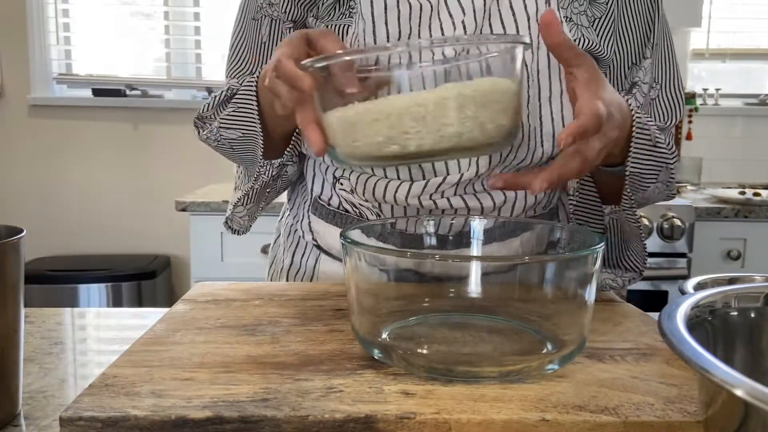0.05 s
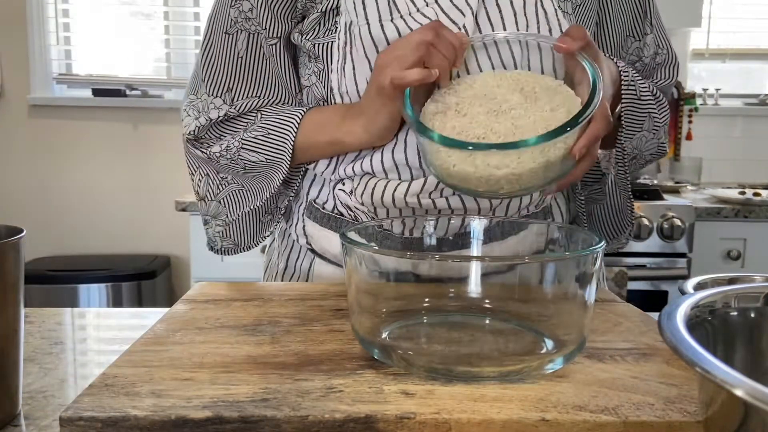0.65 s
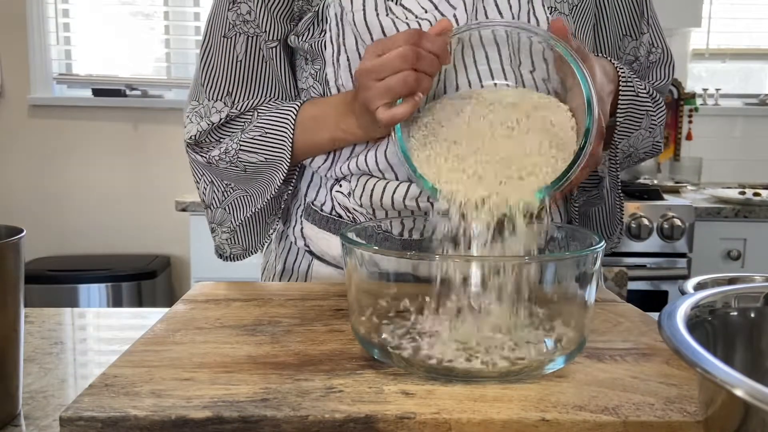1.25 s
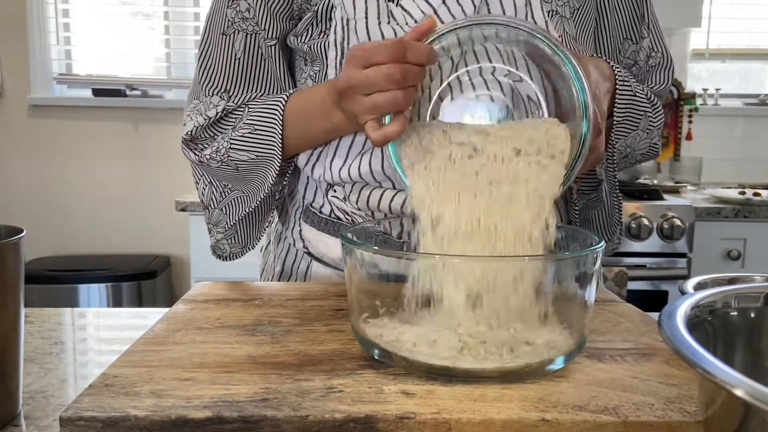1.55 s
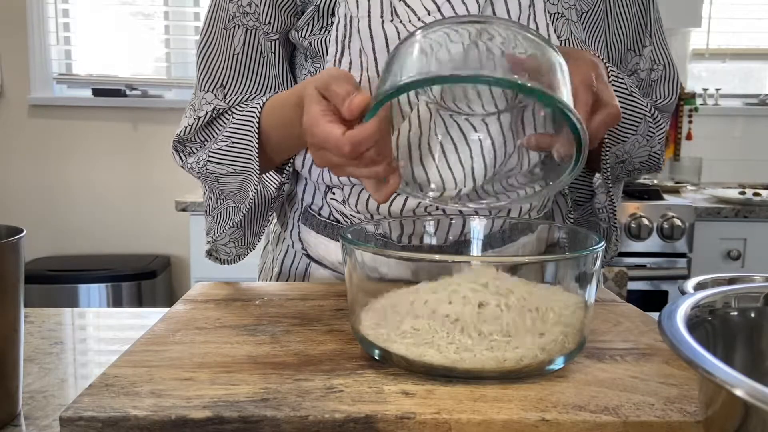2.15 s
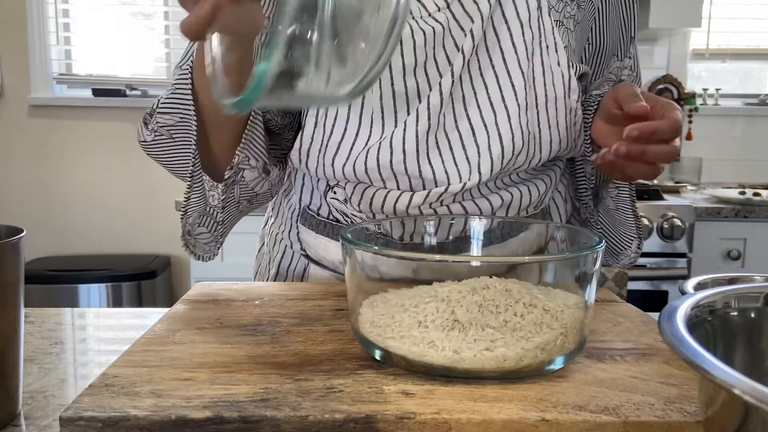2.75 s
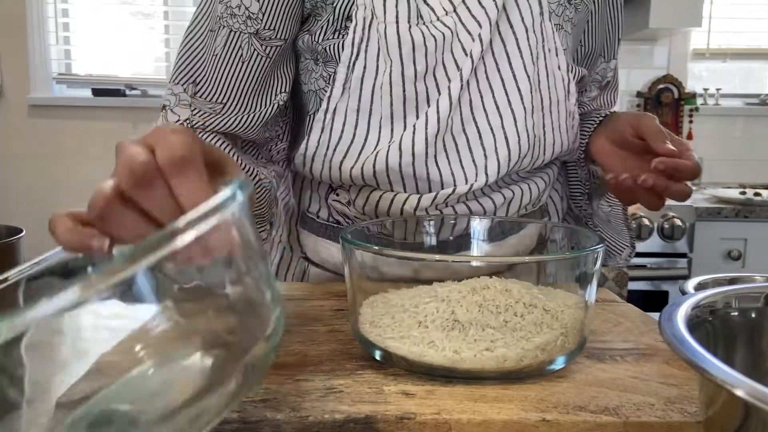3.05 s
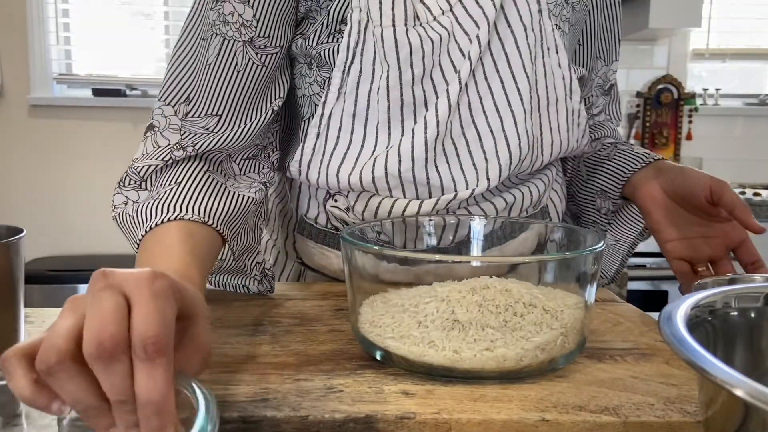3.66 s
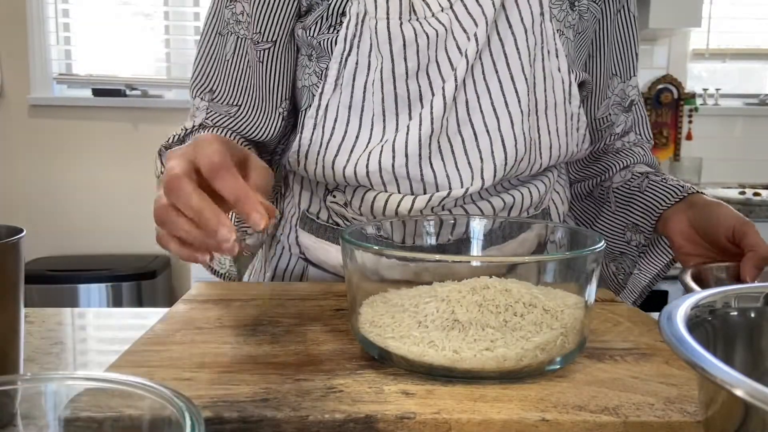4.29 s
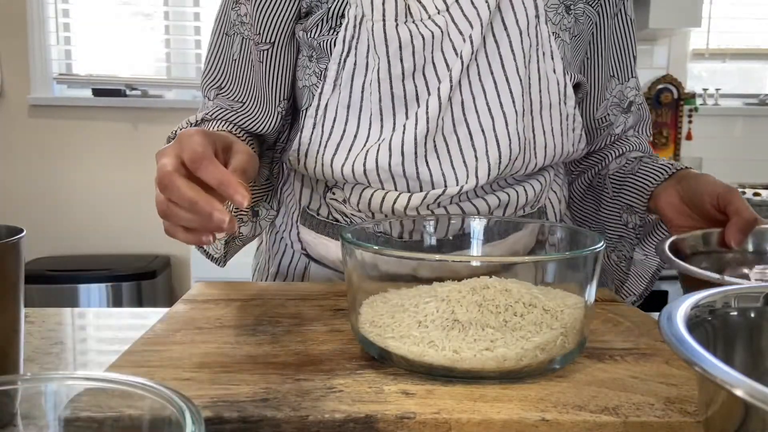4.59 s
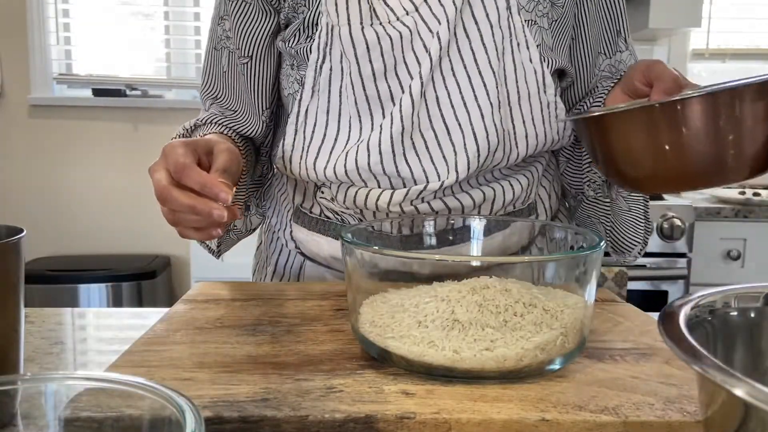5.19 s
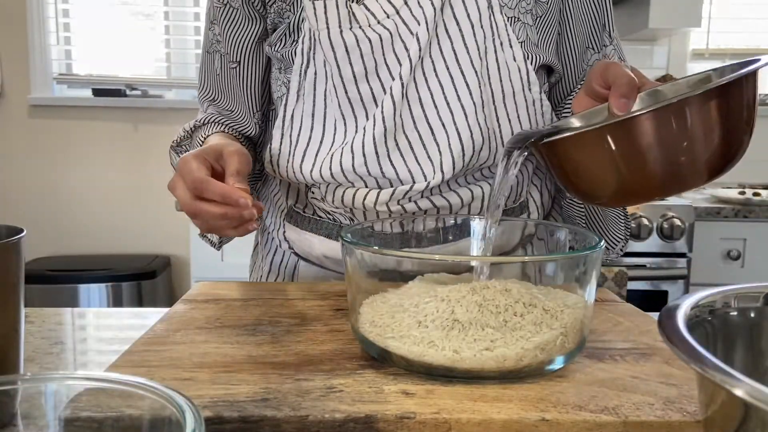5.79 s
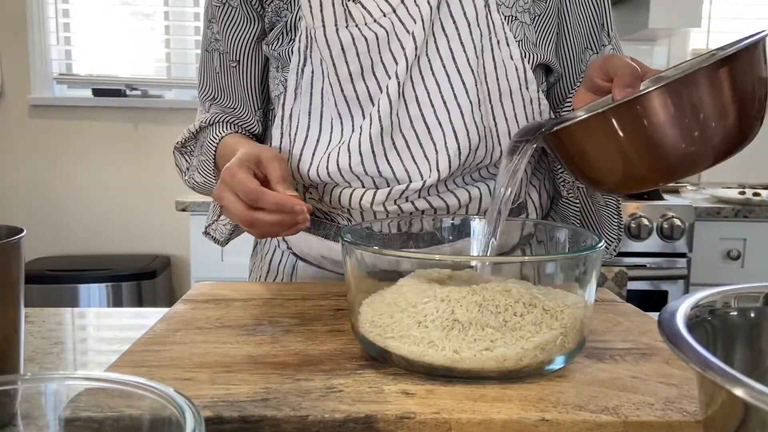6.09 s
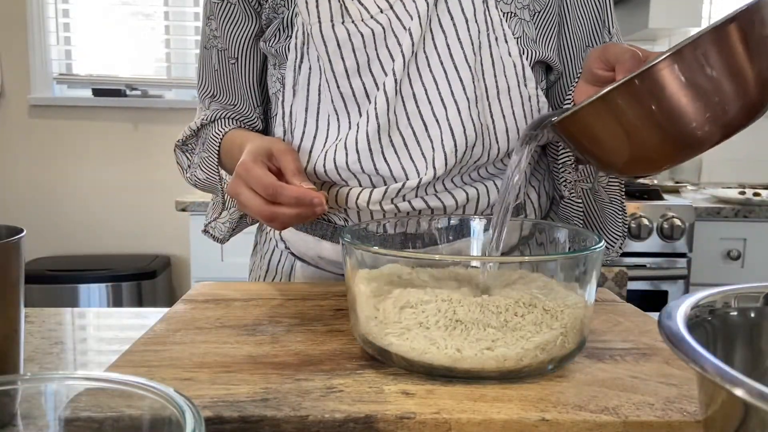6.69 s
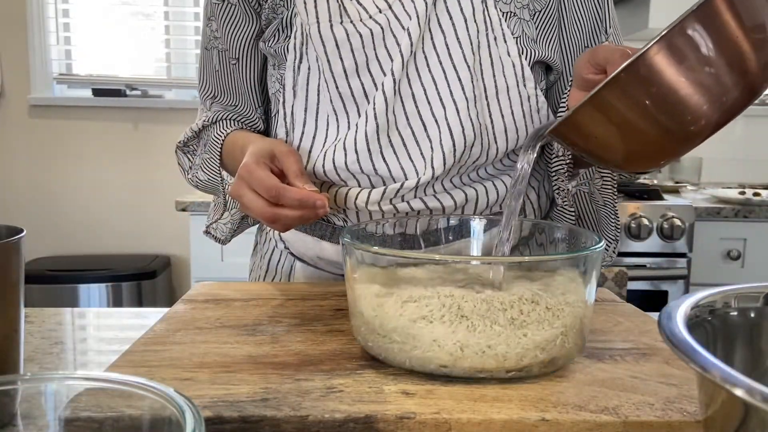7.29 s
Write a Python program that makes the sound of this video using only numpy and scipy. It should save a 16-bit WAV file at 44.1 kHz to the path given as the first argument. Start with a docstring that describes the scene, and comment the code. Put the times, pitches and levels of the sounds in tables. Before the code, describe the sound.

Soft handling and shifting grains lead to a clink of glass against glass, followed by a rush of dry rice falling into a glass bowl. The emptied bowl is put down on stone with a sharp, rocking clatter. Finally, water is poured gently onto the rice, with light spatter, small bubbles and a low drumming. Everything is heard from nearby, over the faint rumble of a kitchen.

```python
"""Rice and water in a glass bowl

Dry rice is tipped from a small glass bowl into a large one on a wooden board in a kitchen.
The rims knock; grains excite the modes of the bare glass, then hiss on the heap that damps it.
The empty bowl clatters down on the stone counter. A thin stream of water then drums, splashes
and fizzes on the rice, trapping bubbles that ring at pitches set by their size."""
import sys
import numpy as np
from scipy import signal
from scipy.fft import rfft, irfft, next_fast_len
from scipy.io import wavfile

SR = 44100
rng = np.random.default_rng(int(sys.argv[2]) if len(sys.argv) > 2 else 0)


def put_to_file(sound):
    """Save the sound as 16-bit audio at rate SR, in the file named by the first command-line argument."""
    columns = np.atleast_2d(sound).T  # one column per channel
    safe = np.clip(columns, -1, 1)
    whole_steps = np.round(safe * 32767)
    wavfile.write(sys.argv[1], SR, whole_steps.astype(np.int16))


N = 328104
TIME = np.arange(N) / SR
LEFT_RIGHT = np.array([[1], [-1]])
WATER_START_S, WATER_ATTACK_S = 5.465, 0.059

# Levels in all tables are relative; T60 is the time a free vibration takes to fall by 60 dB.
# large bowl on its board: (frequency [Hz], T60 [s], level knocked [dB], level under grains [dB])
LARGE_BOWL_MODES = [(86.1, 1, -33.5, -37.5), (202.5, 0.3, -21, -32), (651, 0.2, -17.5, -36.5),
                    (705, 0.12, -6, -23.5), (806, 0.054, -8, -37), (1125.4, 0.23, -18.5, -36.5),
                    (1215, 0.074, -5.5, -37), (1365, 0.45, -28, -38.5), (1588, 0.19, -10, -24.5),
                    (2000, 0.12, -16.5, -32.5), (2156, 0.12, -16, -27.5), (2398, 0.21, -11, 7),
                    (2430, 0.03, -22.5, 6), (2530, 0.25, -23.5, -5), (2750, 0.016, -37.5, -2.5),
                    (4166, 0.1, -28.5, 5), (4251, 0.12, -18, 6.5), (6230, 0.029, -49.5, -0.5),
                    (7610, 0.16, -51, 4.5), (7700, .12, -54, -0.5), (8260, 0.11, -46.5, 2),
                    (9937, 0.11, -56, -2.5), (10400, 0.13, -53.5, 2), (10460, 0.13, -53, 5.5),
                    (10680, 0.07, -52.5, 5.5), (11660, 0.06, -53.5, 4), (13730, 0.12, -47, -1.5),
                    (14708, 0.17, -56, 1.5), (15300, .08, -45.5, -4), (15680, .08, -55, -6)]
# small bowl: (frequency [Hz], T60 [s], rim level [dB], foot level [dB], level under grains [dB])
SMALL_BOWL_MODES = [(1025, 0.18, -44.5, -7, -30), (1530, 0.34, -10, -31, -19.5),
                    (1932, 0.28, -35.5, -15, -40.5), (2206, 0.31, -40.5, -20.5, -38),
                    (2436, 0.21, -34, -14.5, -35.5), (2573, 0.33, -25, -37.5, -26),
                    (3624, 0.33, -55.5, -20.5, -35.5), (3850, 0.22, -23.5, -38.5, -27),
                    (4412, .15, -28.5, -38, -29.5), (5490, 0.34, -42, -44.5, -22),
                    (6115, 0.2, -56, -14.5, -31.5), (7350, .2, -52, -44, -19),
                    (8140, 0.11, -64, -26.5, -31.5), (10400, 0.1, -54, -26, -13.5),
                    (11100, 0.17, -57.5, -25.5, -20), (12200, 0.09, -44, -27.5, -12.5),
                    (14900, .07, -62.5, -33.5, -12), (15400, 0.09, -51.5, -22, -23.5)]
# thud of a hard contact: (frequency [Hz], spectral level [dB])
THUD_SPECTRUM = [(30, -26), (60, -24.5), (120, -19.5), (195, -15), (350, -13.5), (550, -10.5), (800, -2.5),
                 (980, -4), (1130, -6.5), (1350, -1.5), (1900, -7), (2800, -14), (4000, -20), (5200, -30.5),
                 (10000, -25.5), (16000, -29.5)]
# decay of that thud: (frequency [Hz], T60 [s])
THUD_DECAY = [(150, 0.38), (600, 0.072), (2000, 0.058), (5000, 0.056), (15000, 0.051)]
# a diffuse field is alike on both sides in the bass: (frequency [Hz], side minus mid [dB])
DIFFUSE_SIDE = [(130, -19.5), (250, -9.5), (500, -2.5), (16000, -4.5)]
# strength of the water stream: (time [s], level [dB])
STREAM_LEVEL = [(5.51, -51.5), (5.6, -52), (5.74, -53.5), (5.83, -54.5), (6.06, -54), (6.16, -52),
                (6.55, -51.5), (7.079, -56.5), (7.192, -54), (7.44, -58)]


def from_db(db):
    """Decibels to amplitude ratio."""
    return 10 ** (np.asarray(db) / 20)


def rms_one(x):
    """Normalisation to unit rms."""
    return x / np.sqrt(np.mean(x ** 2) + 1e-20)


def at_hz(points, hz):
    """Interpolation on a logarithmic frequency axis."""
    f, value = np.transpose(points)
    return np.interp(np.log(np.maximum(hz, 1)), np.log(f), value)


def shape(x, spectrum, turn=1):
    """Filtering in the frequency domain; a complex turn shifts the phase."""
    size = next_fast_len(x.shape[-1], True)
    gain = turn * from_db(at_hz(spectrum, np.fft.rfftfreq(size, 1 / SR)))
    return irfft(rfft(x, size) * gain, size)[..., :x.shape[-1]]


def soften(x, hz):
    """Low-pass filtering: a softer contact excites less treble."""
    return signal.sosfilt(signal.butter(2, min(hz, .45 * SR), fs=SR, output="sos"), x)


def add(out, s, x):
    """Superposition of x on out from time s."""
    i = round(s * SR)
    out[..., i:i + x.shape[-1]] += x[..., :N - i]


def onset(s, attack_s):
    """Linear ramp from zero to one."""
    return np.clip((TIME - s) / attack_s, 0, 1)


def fading(s, lasts_s):
    """Unity until time s, then exponential decay."""
    return np.exp(-np.maximum(TIME - s, 0) / lasts_s)


def swells(rows):
    """Sum of exponential envelopes (time [s], level [dB], rise [s], fall [s]); each slope spans 20 dB."""
    return sum(from_db(db - 20 * np.minimum(np.maximum((s - TIME) / rise, (TIME - s) / fall), 10))
               for s, db, rise, fall in rows)


def drift(per_s):
    """Slow random modulation: Gaussian values joined by straight lines."""
    knots = rng.standard_normal(4096)
    return np.interp(TIME * per_s, np.arange(len(knots)), knots)


def grains(per_s, spread_db, clump_db):
    """Shot noise of unit rms: random impulses of uneven size whose strength comes in clumps."""
    born = rng.random(N) < per_s / SR
    sizes = from_db(spread_db * np.minimum(rng.exponential(1, N), 4) + clump_db * drift(70))
    return rms_one(born * sizes * rng.choice([-1, 1], N))


def crackle(spectrum, per_s, spread_db, clump_db):
    """Filtered shot noise of unit rms."""
    return rms_one(shape(grains(per_s, spread_db, clump_db), spectrum))


def ring(x, hz, t60):
    """Damped oscillator: a unit impulse starts a decaying sine of amplitude one."""
    r, w = from_db(-60 / (t60 * SR)), 2 * np.pi * hz / SR
    return signal.lfilter([0, np.sin(w)], [1, -2 * r * np.cos(w), r * r], x + 1e-18)


def sing(x, modes):
    """Forced vibration of modes (frequency [Hz], T60 [s], rms gain [dB]) under a stream of impacts."""
    return sum(ring(x, hz, t60) * from_db(db) * np.sqrt(4 * np.log(1000) / (t60 * SR))
               for hz, t60, db in modes)


def strike(modes, held):
    """Free decay of beating mode pairs (frequency [Hz], T60 [s], level [dB]); held scales each T60."""
    hz, t60, db = np.transpose(modes)[:, :, None]
    t = TIME[:SR // 2]
    sign = (-1) ** np.arange(len(hz))[:, None]
    beat_hz = rng.uniform(12, 40, hz.shape) * rng.choice([-1, 1], hz.shape)
    pairs = np.sin(2 * np.pi * hz * t) + 0.42 * np.sin(2 * np.pi * (hz + beat_hz) * t)
    decay = from_db(db + rng.standard_normal(hz.shape) - 60 * t / (held * t60))
    return np.pad(np.sum(sign * pairs * decay, axis=0), (0, SR - len(t)))


def dying_noise(spectrum, t60s):
    """Overlapping modes act as noise: two rows of it, each octave decaying at its own rate."""
    noise = rfft(rms_one(shape(rng.standard_normal((2, SR)), spectrum)))
    octave = np.clip(np.log2(np.fft.rfftfreq(SR, 1 / SR) / 125 + 1e-9), 0, 7)
    bands = [irfft(noise * np.maximum(1 - abs(octave - k), 0), SR) for k in range(8)]
    return sum(band * from_db(-60 * TIME[:SR] / at_hz(t60s, 125 * 2 ** k))
               for k, band in enumerate(bands))


def bubble(hz, cycles, glide=0.062):
    """Volume resonance of one air bubble, rising in pitch as it decays."""
    age = np.arange(int(SR * cycles / hz)) * hz / (SR * cycles)
    return from_db(-60 * age) * np.sin(2 * np.pi * cycles * age * (1 + glide * age))


def bubbles(per_s, low_hz, high_hz, cycles, swell_db, count):
    """Randomly excited bubble resonances, each size waxing and waning on its own; unit rms."""
    pops = grains(per_s, spread_db=2.3, clump_db=2.5)
    size = rng.integers(0, count, N)
    return rms_one(sum(ring(pops * (size == k), hz, cycles / hz) * from_db(swell_db * drift(8.2))
                       for k, hz in enumerate(np.geomspace(low_hz, high_hz, count))))


def room_tone(rumble_db=-49.5, drone_db=-3, waver_db=4.0, wander=0.079):
    """Ambient noise: steady house rumble and a faint drone modulated in pitch and amplitude."""
    # rumble: (frequency [Hz], spectral level [dB])
    spectrum = [(20, -13), (65, 1), (120, -9), (150, -8), (262, -13), (293, -12.5), (337, -11),
                (422, -25.5), (527, -23), (738, -36.5), (1450, -41), (6540, -50.5), (16000, -66.5)]
    # its stereo width: (frequency [Hz], side minus mid [dB])
    width = [(60, -16.5), (180, -10), (550, -1.5), (1650, 0.5), (4970, -3.5), (15000, 3)]
    # the drone lifts, then sinks: (time [s], frequency [Hz], level [dB])
    drone_path = [(0, 160.8, -49), (0.351, 168, -55), (0.752, 186.6, -42.5), (1.2, 166.9, -47.5),
                  (1.651, 140.8, -44), (2.048, 123, -40), (2.6, 120, -46.5), (3.4, 118.2, -44.5),
                  (3.9, 118.3, -68.5)]
    mid, side = (rms_one(shape(noise, spectrum)) for noise in rng.standard_normal((2, N)))
    rumble = mid + shape(side, width) * LEFT_RIGHT
    s, pitch, level = np.transpose(drone_path)
    hz = np.interp(TIME, s, pitch) * (1 + wander * drift(43))
    envelope = from_db(np.interp(TIME, s, level) + waver_db * drift(18)) * fading(s[-1], 0.094)
    drone = envelope * np.sin(2 * np.pi * np.cumsum(hz) / SR)
    return from_db(rumble_db) * rumble + from_db(drone_db) * drone


def kitchen_reverb(x, build_s=0.0039):
    """Reverberation: convolution with diffuse echoes that differ left and right above the bass."""
    # wall reflections: (frequency [Hz], spectral level [dB])
    walls = [(60, -11), (200, 0.5), (700, -1), (2500, 2), (6000, -4), (16000, -9.5)]
    # reverberation time: (frequency [Hz], T60 [s])
    decay = [(100, 0.17), (500, 0.72), (1500, 0.42), (4000, .38), (15000, 0.24)]
    mid, side = dying_noise(walls, decay) * (1 - np.exp(-(TIME[:SR] / build_s) ** 2))
    echoes = mid + shape(side, DIFFUSE_SIDE) * LEFT_RIGHT
    return signal.fftconvolve(x[None], rms_one(echoes) / np.sqrt(SR), axes=1)[:, :N]


def handling(shift_db=-2.5, rub_db=-2):
    """Friction: grains, fingers, palm and sleeve move in tiny slips that crackle and ring the glass."""
    # movements in and around the small bowl: (time [s], level [dB], rise [s], fall [s])
    grain_shifts = [(.146, -59, 0.046, 0.073), (.228, -55, 0.051, 0.054), (.505, -65, 0.37, 0.19),
                    (.788, -45, 0.0042, .015), (.872, -38, 0.099, 0.27), (2.62, -48.5, 0.071, 0.085),
                    (2.87, -61.5, 0.12, 0.13), (3.04, -72.5, 0.027, .06)]
    finger_rubs = [(.2, -69.5, 0.31, 0.38), (.845, -55, 0.13, 0.32), (1.97, -50, .12, 0.081),
                   (2.645, -60.5, .13, 0.11), (2.823, -53, 0.0042, 0.016), (2.886, -51.5, 0.07, .02)]
    sleeve_brushes = [(3.94, -63.5, .04, 0.043), (3.983, -48, 0.0046, 0.029), (4.09, -62.5, .2, 0.43)]
    palm_slides = [(.02, -54, .2, 0.15), (.11, -51.5, 0.03, 0.033), (.46, -65, 0.184, 0.17),
                   (2.88, -55, 0.06, 0.058)]
    # friction noise of each: (frequency [Hz], spectral level [dB])
    grain_spectrum = [(1500, -21), (3000, -2), (5500, -6.5), (6600, 8), (8000, -10), (11000, 10),
                      (16000, 3.5)]
    finger_spectrum = [(400, -8), (780, 10.5), (1020, 4), (1250, -0.5), (1900, -3.5), (2150, -7.5),
                       (2430, 10), (2800, -4.5), (3400, -14), (4350, 1), (5000, -17), (6600, -11.5),
                       (8000, -26), (16000, -34)]
    sleeve_spectrum = [(1000, -10), (2800, -3.5), (3800, 5), (5500, 2.5), (8000, -6.5), (11000, 1),
                       (16000, -13.5)]
    palm_spectrum = [(250, -7.5), (500, 5), (1000, 5), (1400, 0.5), (1800, -0.5), (2150, -5.5), (2450, 8.5),
                     (2900, -12), (4300, -17.5), (7000, -31)]
    # glass squeaking under the fingers: (frequency [Hz], T60 [s], level [dB])
    squeak_modes = [(1050, .08, -8.5), (2438, 0.08, -6.5), (3650, .06, -9), (4370, 0.018, -2),
                    (6600, .025, -14)]
    shift = swells(grain_shifts) * crackle(grain_spectrum, per_s=2000, spread_db=-0.5, clump_db=1.5)
    slips = swells(finger_rubs) * grains(per_s=2500, spread_db=1.5, clump_db=-4.0)
    rub = from_db(rub_db) * shape(slips, finger_spectrum) + sing(slips, squeak_modes)
    sleeve = swells(sleeve_brushes) * crackle(sleeve_spectrum, per_s=16000, spread_db=3.5, clump_db=1.5)
    palm = swells(palm_slides) * crackle(palm_spectrum, per_s=3400, spread_db=6.5, clump_db=-0.5)
    return from_db(shift_db) * shift + rub + palm + sleeve


def stream_gain():
    """Amplitude envelope of the water stream: an abrupt start, then slow fluctuation."""
    return onset(WATER_START_S, WATER_ATTACK_S) * from_db(np.interp(TIME, *np.transpose(STREAM_LEVEL)))


def water_drumming(drum_db=-4, glug_db=-5, bed_db=-54, rise_s=0.076, fall_s=0.064):
    """Impact noise: the stream drums on the bed of rice and drives low bubble resonances."""
    # drumming: (frequency [Hz], spectral level [dB])
    spectrum = [(50, -8), (90, -6), (140, 20), (190, -5), (230, -0.5), (280, 4), (370, -11), (430, -3),
                (550, -99), (900, -38)]
    # the stream digs in and drums harder: (time [s], level [dB])
    surges = [(5.63, -45.5), (5.73, -44.5), (5.859, -36), (6.04, -44), (6.24, -42), (6.6, -40.5),
              (6.73, -38), (6.94, -46.5), (7.18, -50.5), (7.41, -37)]
    surging = swells([(s, db, rise_s, fall_s) for s, db in surges])
    force = onset(WATER_START_S, WATER_ATTACK_S) * (from_db(bed_db) + surging)
    drum = crackle(spectrum, per_s=800, spread_db=0.0, clump_db=-0.5)
    glug = bubbles(per_s=670, low_hz=126.7, high_hz=192.2, cycles=40, swell_db=2.5, count=6)
    return force * (from_db(drum_db) * drum + from_db(glug_db) * glug)


def water_pool(bubble_db=-10, hollow_db=-7.0, no_pool_db=-20.5, gather_s=0.45):
    """Air entrainment: as a pool gathers, bubbles ring and the air in the bowl resonates."""
    # hollow above the wet rice: (frequency [Hz], T60 [s], level [dB])
    cavity_modes = [(720, 0.082, -25.5), (868, 0.23, -7.5), (1050, 0.29, -14.5), (1285, 0.032, -2),
                    (1430, 0.05, -4.5), (1600, 0.13, -8.5)]
    pool = stream_gain() * from_db(no_pool_db * fading(WATER_START_S, gather_s))
    burble = bubbles(per_s=470, low_hz=720, high_hz=2030, cycles=22, swell_db=5.5, count=18)
    hollow = sing(grains(per_s=830, spread_db=-1.0, clump_db=3.5), cavity_modes)
    return pool * (from_db(bubble_db) * burble + from_db(hollow_db) * hollow)


def water_splash(spatter_db=0.3, pop_db=-6):
    """Drop impacts radiate shot noise, excite the glass and trap small resonant bubbles."""
    # spatter: (frequency [Hz], spectral level [dB])
    spectrum = [(1200, -23.5), (1750, -4), (2250, 0), (3200, 7), (3700, 7.5), (4200, 3), (4800, 0),
                (5400, 5), (6500, -30), (9000, -31)]
    # brief ring of the weighted bowl: (frequency [Hz], T60 [s], level [dB])
    glass_modes = [(3677, 0.03, -5.5)]
    spatter = crackle(spectrum, per_s=5000, spread_db=2.4, clump_db=1.0)
    glass = sing(grains(per_s=330, spread_db=3.5, clump_db=2), glass_modes)
    pops = bubbles(per_s=750, low_hz=2100, high_hz=7600, cycles=52, swell_db=5.0, count=22)
    return stream_gain() * (from_db(spatter_db) * spatter + glass + from_db(pop_db) * pops)


def water_fizz(fizz_db=-44, follows_stream=0.88, wetting_db=11, wetting_s=0.0356):
    """Displacement: water drives air from between the grains, most strongly when first wetting them."""
    # bright fizz of water on rice: (frequency [Hz], spectral level [dB])
    spectrum = [(3000, -22), (5800, -5), (6700, 2.5), (8200, 5), (9300, -16.5), (10400, 12), (11800, 2.5),
                (13000, -8.5), (14700, 7.5), (16000, -2)]
    s, stream_db = np.transpose(STREAM_LEVEL)
    swing_db = np.interp(TIME, s, stream_db) - stream_db.mean()
    level_db = fizz_db + follows_stream * swing_db + wetting_db * fading(WATER_START_S, wetting_s)
    fizz = crackle(spectrum, per_s=4000, spread_db=1.0, clump_db=1.74)
    return onset(WATER_START_S, WATER_ATTACK_S) * from_db(level_db) * fizz


def spray(level_db=-8.0, cycles=22, low_hz=2200, high_hz=6500, count=12):
    """Each droplet traps a bubble; two resonators in cascade make its blip swell and decay."""
    landings = grains(per_s=60, spread_db=3.5, clump_db=1)
    size = rng.integers(0, count, N)
    blips = np.zeros(N)
    for k, hz in enumerate(np.geomspace(low_hz, high_hz, count)):
        t60 = cycles / hz
        blips += ring(ring(landings * (size == k), hz, t60), hz, t60) / t60
    return stream_gain() * from_db(level_db) * rms_one(blips)


def bubble_clouds(cycles=52, spread_db=4, count=70):
    """Incoherent superposition: crowds of bubbles born at random within spans of time and pitch."""
    # clouds whipped up by the stream: (time [s], length [s], level [dB], lowest [Hz], highest [Hz])
    clouds = [(5.48, .15, -44.5, 6290, 7730), (5.504, 0.14, -47, 3230, 4700),
              (5.584, 0.035, -46.5, 2180, 3290), (5.631, .14, -50, 2120, 3100),
              (5.689, .1, -51, 3260, 4100), (5.906, .12, -50.5, 5280, 7400), (6.003, 0.15, -60.5, 648, 836),
              (6.163, .18, -59.5, 2120, 3190), (6.318, .62, -56.5, 4900, 5540),
              (6.466, 0.14, -51, 2000, 7060), (6.486, 0.08, -56, 774, 1600), (6.733, .1, -55, 400, 435),
              (7.132, 0.082, -51, 6600, 8100), (7.147, 0.075, -58.5, 910, 4200)]
    out = np.zeros(N)
    for s, length, db, low_hz, high_hz in clouds:
        cloud = np.zeros(SR)
        for when, pitch, strength, sign in rng.uniform(0, 1, (count, 4)):
            gain = np.sign(sign - .5) * from_db(-spread_db * np.log(max(strength, .05)))
            add(cloud, when * length, gain * bubble(low_hz * (high_hz / low_hz) ** pitch, cycles))
        add(out, s, from_db(db) * rms_one(cloud) * np.sqrt(length))
    return out


def single_drops():
    """Bubble resonances strong enough to stand out singly."""
    # drops and bubbles: (time [s], level [dB], frequency [Hz], ring length [cycles])
    drops = [(5.577, -29, 4100, 50), (5.607, -33, 2717, 100), (5.737, -30, 3700, 40),
             (5.785, -34, 3600, 34), (5.866, -36, 3600, 45), (5.964, -40.5, 2260, 44),
             (6.145, -31.5, 3650, 67), (6.294, -38, 1413, 25), (6.615, -26.5, 3666, 30),
             (6.622, -36, 1037, 120), (6.626, -33, 834, 20), (6.69, -32, 3110, 25), (6.918, -34, 3560, 40),
             (7.313, -37, 3645, 78)]
    out = np.zeros(N)
    for s, db, hz, cycles in drops:
        add(out, s, from_db(db) * bubble(hz, cycles))
    return out


def rim_knock(at_s=.8752, level_db=5, rise_s=0.0051, crack_db=-12, crack_hz=4000, contact_hz=2000):
    """Impulse response of both bowls as the rims meet; it builds as the board takes up the blow."""
    modes = [mode[:3] for mode in (*LARGE_BOWL_MODES, *SMALL_BOWL_MODES)]
    glass = soften(strike(modes, held=.7), contact_hz) * (1 - np.exp(-TIME[:SR] / rise_s))
    crack = from_db(crack_db) * soften(dying_noise(THUD_SPECTRUM, THUD_DECAY)[0], crack_hz)
    out = np.zeros(N)
    add(out, at_s, from_db(level_db) * (glass + crack))
    return out


def bowl_clatter(thud_db=-5.0, grit_db=-18, favour_db=7.5, width=0.89, left_db=0.94, lag_s=.0003):
    """Repeated impact: the empty bowl rocks on its foot, exciting modes of the glass and the stone."""
    # contacts: (time [s], level [dB], thud cutoff [Hz], glass [dB], counter [dB], favoured mode [Hz])
    contacts = [(3.42, -22.5, 2428, -23.5, -7.5, 2436), (3.4295, -2, 12100, -0.5, -7.5, 1025),
                (3.4334, 2.5, 9000, -1.5, -9, 2436), (3.4915, 1.5, 8700, -4, -9, 1025),
                (3.5172, -3, 6500, -7, -11.5, 6115), (3.5336, -8, 6500, -3.5, -5, 6115),
                (3.7407, -4, 2690, -10, -6.5, 3624)]
    # stone counter: (frequency [Hz], T60 [s], level [dB])
    counter_modes = [(194.3, 0.29, -12.5), (270.3, 0.3, -15.5), (442, 0.62, -24.5), (680, 0.27, -13),
                     (815, 0.39, -21.5), (934, 0.2, -12.5), (952, 0.18, -13.5), (1136, 0.41, -21),
                     (1395, 0.26, -20.5)]
    out = np.zeros((2, N))
    hz, t60, _, foot_db, _ = np.transpose(SMALL_BOWL_MODES)
    for s, db, cutoff_hz, glass_db, counter_db, favoured_hz in contacts:
        blow = dying_noise(THUD_SPECTRUM, THUD_DECAY)
        mid, side = soften(blow, cutoff_hz) + from_db(grit_db) * blow
        thud = from_db(thud_db) * (mid + width * shape(side, DIFFUSE_SIDE) * LEFT_RIGHT)
        # the point of contact favours one mode
        favoured = np.arange(len(hz)) == np.argmin(abs(hz - favoured_hz))
        modes = np.transpose([hz, t60, foot_db + favour_db * favoured])
        glass = from_db(glass_db) * soften(strike(modes, held=0.87), 6 * cutoff_hz)
        slab = from_db(counter_db) * strike(counter_modes, held=0.82)
        add(out, s, from_db(db) * (thud + glass + slab))
    # the bowl is on the left, so the right channel is later and weaker
    right = np.interp(TIME - lag_s, TIME, out[1])
    return np.array([out[0], right]) * from_db(left_db * LEFT_RIGHT)


def loaded_bowl(impacts, load, broadening_hz=24, skirt_hz=270):
    """Damping: grains strike each mode with random strength, and the heap broadens the resonances."""
    # attenuation under the full heap: (frequency [Hz], loss [dB])
    load_loss = [(1600, 0.5), (2400, 13), (2760, 2.8), (4200, 12.9), (8000, 6.9), (10500, 0.95),
                 (15000, 1.96)]
    out = np.zeros(N)
    free, loaded = impacts * (1 - load), impacts * np.sqrt(load)
    for hz, t60, _, db in LARGE_BOWL_MODES:
        coupling = rng.standard_normal(N)
        damped_t60 = 1 / (1 / t60 + np.pi * broadening_hz / np.log(1000))
        clear = sing(free * coupling, [(hz, t60, db)])
        damped = sing(loaded * coupling[::-1], [(hz, damped_t60, db - at_hz(load_loss, hz))])
        # steep skirts keep it quiet between the modes
        band = [max(hz - skirt_hz, hz / 2), hz + skirt_hz]
        out += signal.sosfilt(signal.butter(1, band, "band", fs=SR, output="sos"), clear + damped)
    return out


def singing_lip(remaining, level_db=-25, full_bowl_db=-12, waver_db=2.0, grains_t60_s=0.065):
    """Forced vibration: rice sliding over the lip rings the small bowl, louder as it empties."""
    force = from_db(level_db + full_bowl_db * remaining + waver_db * drift(12))
    modes = [(hz, 1 / (1 / t60 + 1 / grains_t60_s), db) for hz, t60, _, _, db in SMALL_BOWL_MODES]
    return sing(force * grains(per_s=10000, spread_db=3.0, clump_db=6.5), modes)


def rice_pour(start_s=1.089, end_s=2.16, sag_db_per_s=7.5, release_db_per_s=163.5, patter_db=-32,
              covered_s=1.564, cover_loss_db=17.5, ring_db=1, bounce_db=-7, load_loss_db=6, hiss_db=-27):
    """Granular impact: falling grains ring the bare bowl, then hiss on their own growing heap."""
    # grains bouncing on glass: (frequency [Hz], spectral level [dB])
    bounce_spectrum = [(150, -19.5), (700, -21), (1300, -25), (1800, -27), (2450, -2.5), (2800, 6),
                       (3400, 1.5), (4100, 5.5), (4900, -32), (5800, -15), (6400, 4), (7000, 4.5),
                       (8500, -13.5), (11000, -3.5), (16000, -2.5)]
    # hiss of the rice heap, with a low hollow tone: (frequency [Hz], spectral level [dB])
    heap_spectrum = [(100, -8.5), (300, -0.5), (480, -4.5), (660, 12), (880, -9), (1120, 0.5),
                     (1400, -15.5), (1800, -13.5), (2400, -9.5), (3300, -7), (4300, -9), (5200, -11),
                     (7700, -2.5), (9000, -26.5), (11000, 3), (13000, -5.5), (15000, 4)]
    # swell whose tail shapes the first clump on the glass: (time [s], level [dB], rise [s], fall [s])
    first_clump = (0.9921, -26.5, 1.9, 0.13)
    # the stream thins slowly, then runs out
    loss_db = sag_db_per_s * np.maximum(TIME - start_s, 0) + release_db_per_s * np.maximum(TIME - end_s, 0)
    flow = onset(start_s, attack_s=0.018) * from_db(-np.minimum(loss_db, 150))
    # once the floor of the bowl is covered, few grains hit bare glass
    covered = .5 + .5 * np.tanh(.5 * (TIME - covered_s) / 0.024)
    load = 1 - fading(start_s, lasts_s=0.18)
    on_glass = flow * from_db(patter_db - cover_loss_db * covered)
    impacts = on_glass * grains(per_s=3000, spread_db=1.5, clump_db=2.5)
    clump = flow * swells([first_clump]) * grains(per_s=6800, spread_db=3.0, clump_db=2.0)
    glass = from_db(ring_db) * loaded_bowl(impacts + soften(clump, hz=3800), load)
    bounce = shape(impacts * from_db(bounce_db - load_loss_db * load), bounce_spectrum)
    hiss = crackle(heap_spectrum, per_s=16000, spread_db=2.5, clump_db=3.0)
    heap = from_db(hiss_db) * load ** 0.67 * hiss
    lip = singing_lip(remaining=1 - onset(start_s, end_s - start_s)) * fading(end_s, 0.045)
    return glass + bounce + flow * (heap + lip)


def scene(knock_echo_db=-19, pour_echo_db=-11, clatter_echo_db=-16, left_db=.25):
    """Superposition of direct sound, reverberation and ambient noise."""
    # stereo width of sounds from the board: (frequency [Hz], side minus mid [dB])
    board_side = [(60, -22), (700, -7.5), (1500, -11.5), (2400, -15), (4400, -9), (8000, -1.5),
                  (15000, -0.5)]
    knock, clatter = rim_knock(), bowl_clatter()
    pouring = rice_pour() + handling()
    pouring += water_drumming() + water_pool() + water_splash() + water_fizz()
    pouring += spray() + bubble_clouds() + single_drops()
    board = knock + pouring
    # a side signal in quadrature puts left and right slightly out of phase
    direct = board + shape(board, board_side, turn=-1j) * LEFT_RIGHT
    echoes = kitchen_reverb(from_db(knock_echo_db) * knock + from_db(pour_echo_db) * pouring
                            + from_db(clatter_echo_db) * clatter[0])
    return direct * from_db(left_db * LEFT_RIGHT) + clatter + echoes + room_tone()


def record(dry, cutoff_hz=15900):
    """Soft saturation rounds the peaks at full scale; a steep low-pass cuts the top."""
    rounded = dry / (1 + dry ** 8) ** (1 / 8)
    return signal.sosfilt(signal.ellip(10, .1, 70, cutoff_hz, fs=SR, output="sos"), rounded)


dry = scene()
out = record(dry)
put_to_file(out)
```